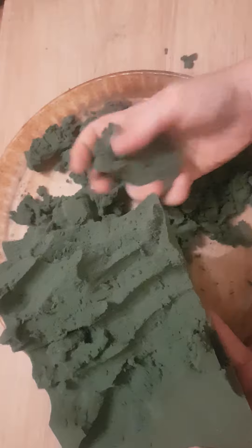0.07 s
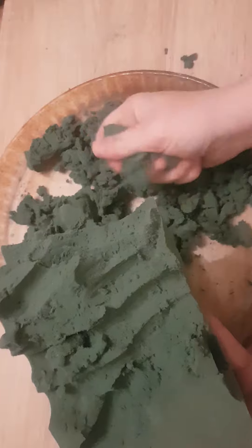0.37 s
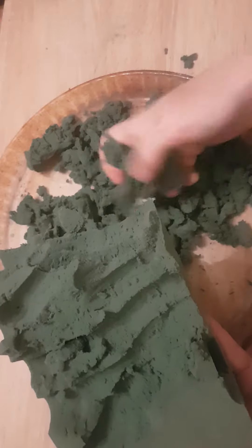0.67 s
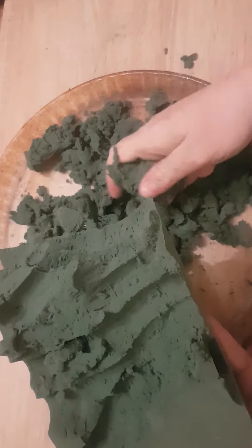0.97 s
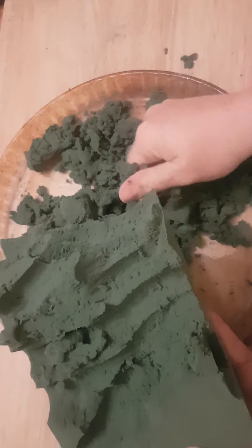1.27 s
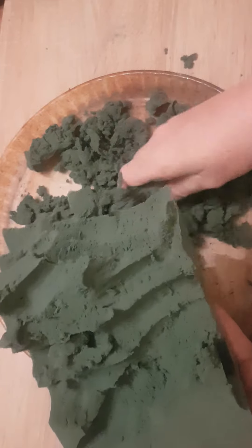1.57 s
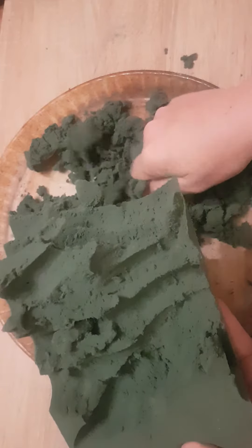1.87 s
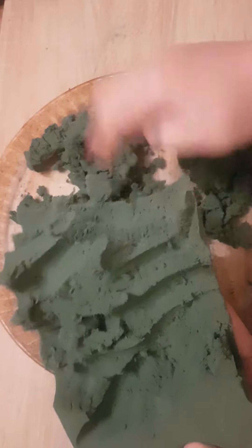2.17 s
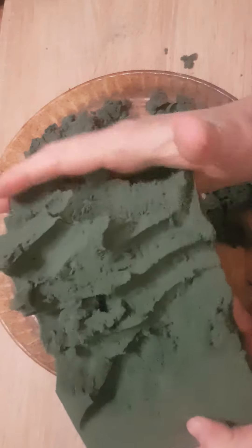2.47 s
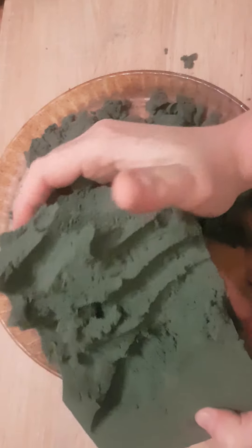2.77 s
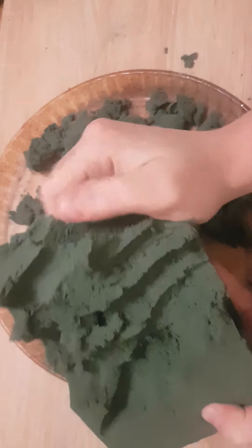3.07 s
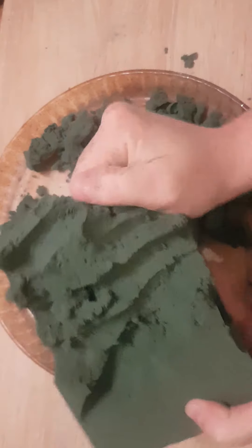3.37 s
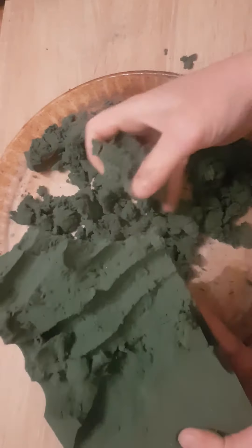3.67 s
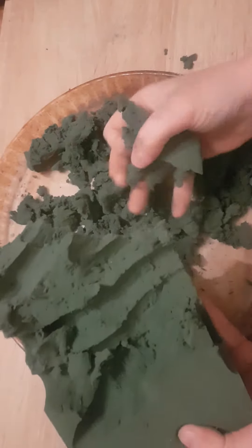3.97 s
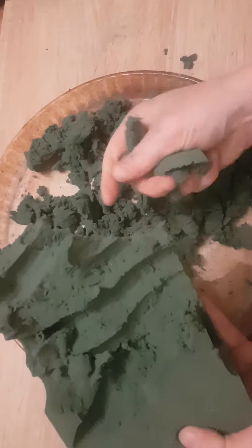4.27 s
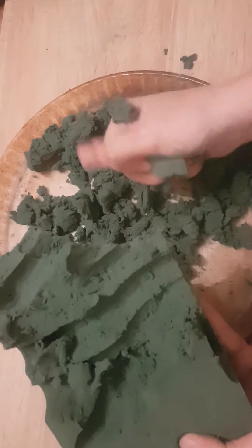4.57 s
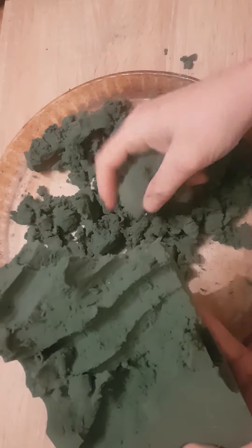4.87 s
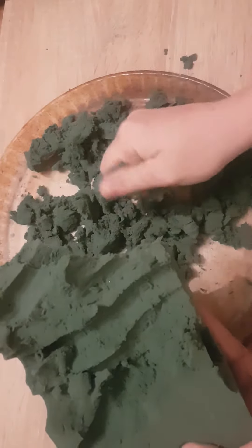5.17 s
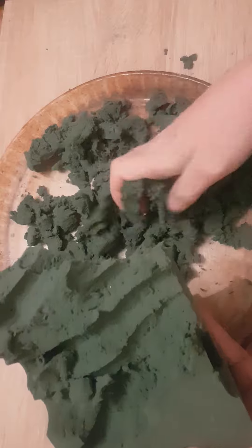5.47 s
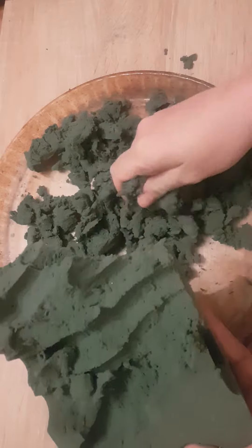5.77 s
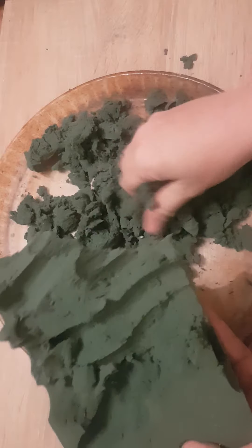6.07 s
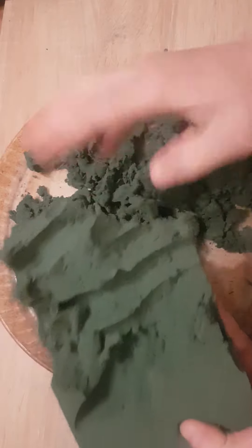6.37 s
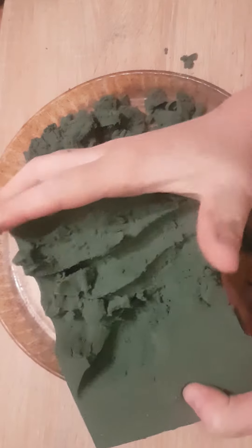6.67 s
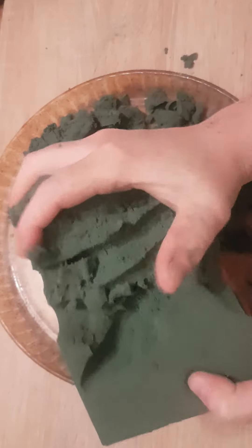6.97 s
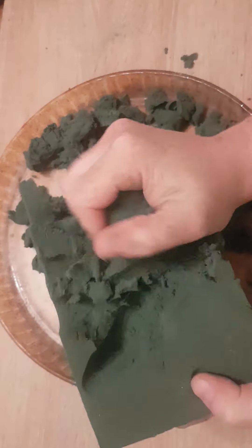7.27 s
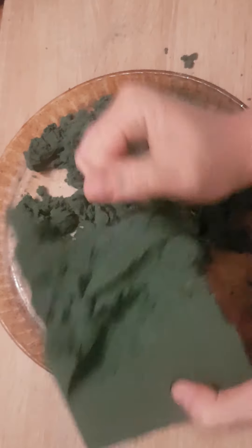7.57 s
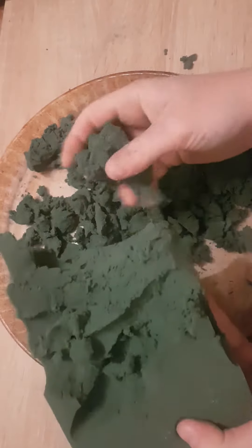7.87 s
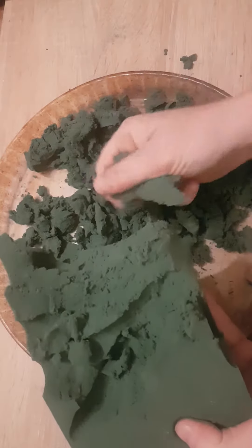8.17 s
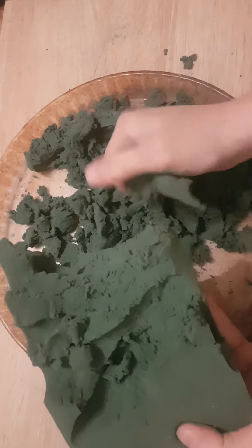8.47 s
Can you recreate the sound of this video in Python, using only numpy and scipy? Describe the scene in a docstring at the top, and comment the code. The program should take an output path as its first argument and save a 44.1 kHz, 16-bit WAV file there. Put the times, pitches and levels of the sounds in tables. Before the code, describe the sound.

Dry foam crunches and snaps twice under digging fingers, and the loose pieces are ground to powder with a faint hiss.

```python
"""Crumbling dry floral foam

A hand crumbles the foam over a plastic plate on a table, close by in a quiet room. Twice the fingers
dig through the big block's brittle cells and break a piece off; each crack rings the plate.
In between they squeeze the loose pieces to powder: a soft hiss with scuffs and small ticks."""
import sys
import numpy as np
from scipy import signal
from scipy.io import wavfile

SR = 44100
rng = np.random.default_rng(int(sys.argv[2]) if len(sys.argv) > 2 else 0)


def bounce(signal):
    """Save signal as a 16-bit WAV file at the path given by the first command-line argument."""
    frames = np.transpose(np.atleast_2d(signal))
    limited = np.clip(frames, -1, 1)
    pcm = np.round(limited * 32767).astype(np.int16)
    wavfile.write(sys.argv[1], SR, pcm)


N = 380141

# The tone of crumbs being crushed. Each row: frequency in Hz, level in dB.
CRUMB_TONE = [(100, -28), (330, 2.5), (460, -13), (650, 3.5), (1150, 0), (1800, -4), (2500, 0), (3500, 0),
              (7500, -3), (10000, -7), (16000, -16)]


def cracks(knock_hz=250, low_ratio=0.6, first_snap_db=7, give_share=0.3):
    """The block snaps and splinters; as the piece gives, it swings, knocks and rings the plate."""
    # Each row: start in seconds, level in dB, pitch in Hz, splintering time in seconds,
    # then the dB added for the splinters, the low swing, the knock and the plate.
    breaks = [(2.7371, -17.5, 1200, 0.0016, 1.5, 0, -7, -7.5),
              (3.185, -19.5, 1210, 0.0041, -2, 2.5, -1.5, -8),
              (3.353, -28.5, 1160, 0.0031, -6, -8.5, -1.5, 2.5),
              (3.4096, -32.5, 1730, 0.003, -3, -3, -3, -8),
              (7.113, -21.5, 1146, .005, -3.5, -9, -21.5, -3.5),
              (7.1647, -13, 1190, 0.0028, -8.5, 4, -1.5, -7), (7.2304, -17, 910, 0.007, -7, 2.5, 3.5, -8.5)]
    # The plastic plate's notes. Each row: pitch in Hz, level in dB, seconds to fade by 60 dB.
    plate_notes = [(765, -1.5, .02), (1206, -2.5, .034), (2370, -7, 0.018), (3000, -5.5, 0.02),
                   (4100, -15.5, 0.0086)]
    # The tone of splintering. Each row: frequency in Hz, level in dB.
    splinter_tone = [(100, -17), (300, -7.5), (1000, 5), (4400, -2), (6000, -15), (9000, -21),
                     (16000, -34.5)]
    out, t = np.zeros(N), np.arange(SR // 10) / SR
    knock = ring(knock_hz, cycles=0.26, rise=0.4)
    plate = sum(amp(db) * ring(hz, cycles=hz * fade / np.log(1000), rise=0.3)
                for hz, db, fade in plate_notes)
    for s, db, hz, run_on, splinters_db, low_db, knock_db, plate_db in breaks:
        snaps = amp(first_snap_db) * (t == 0) + rng.choice([-1., 1.], len(t)) * np.exp(-t / run_on)
        splinters = amp(3.5 + splinters_db) * colour(snaps, splinter_tone)
        add(out, s, amp(db) * (ring(hz, cycles=1.3, rise=0.24) + splinters))
        swing = amp(low_db) * ring(hz * low_ratio, cycles=0.72, rise=0.28)
        giving_way = swing + amp(knock_db) * knock + amp(plate_db) * plate
        add(out, s + give_share * run_on, amp(db) * giving_way)
    return out


def collapsing_foam():
    """Tiny cells collapse with a crunch, a boom from the block and a hiss of fine powder."""
    # The tones of the three sounds. Each row: frequency in Hz, level in dB.
    crunch_tone = [(100, -36), (300, -11.5), (550, -0.5), (1250, -1.5), (2200, -9), (3000, -11.5),
                   (4200, -17), (6000, -24.5), (15000, -53)]
    boom_tone = [(30, -30), (90, -12.5), (170, 3), (280, 4), (420, -0.5), (620, -5.5), (1500, -36.5)]
    powder_tone = [(500, -25.5), (2000, 1), (3500, 0.5), (6000, -3.5), (8200, -3), (10000, -9),
                   (13000, -13), (16000, -24.5)]
    bunches = clumps(per_s=180, depth_db=1.98)
    crunch = unit(colour(bunches * cells(per_s=5000, spread_db=1.8), crunch_tone))
    boom = unit(colour(bunches * cells(per_s=4500, spread_db=2), boom_tone))
    powder = unit(colour(cells(per_s=20000, spread_db=3.5), powder_tone))
    return crunch, boom, powder


def digging():
    """How strong the crunch, boom and powder are as the fingers plough through the block."""
    # One list per finger stroke. Each row: time in seconds, then crunch, boom and powder in dB.
    strokes = [
        [(2.395, -62, -69, -69.5), (2.404, -56.5, -64, -60), (2.495, -53, -53, -57.5),
         (2.52, -40.5, -49, -57.5), (2.7, -41.5, -44.5, -58.5), (2.8, -40.5, -45, -52),
         (2.86, -35.5, -41, -51.5), (2.94, -39.5, -44.5, -50), (3.045, -38.5, -45, -48),
         (3.13, -35, -44.5, -41.5), (3.24, -46, -44, -50.5), (3.32, -61, -53.5, -60), (3.35, -48, -54, -58)],
        [(6.575, -68.5, -76, -69), (6.625, -56.5, -63.5, -68.5), (6.68, -60, -62.5, -69),
         (6.84, -39.5, -44.5, -60), (6.95, -47.5, -53.5, -58.5), (7.02, -42.5, -45.5, -51.5),
         (7.037, -34, -47, -51), (7.11, -30, -48, -49), (7.2, -33.5, -44, -45), (7.36, -49, -45.5, -48.5),
         (7.41, -55.5, -62, -62.5), (7.5, -65, -69, -64)],
    ]
    out, t = np.zeros((3, N)), np.arange(N) / SR
    for stroke in strokes:
        s, *levels = np.transpose(stroke)
        out += amp([np.interp(t, s, db, left=-np.inf, right=-np.inf) for db in levels])
    return out


def hollows(width_hz=100):
    """Collapsing cells ring the hollow under the hand; its pitch slides as it changes shape."""
    # One list per sliding note. Each row: time in seconds, pitch in Hz, level in dB.
    slides = [
        [(2.7, 1300, -53.5), (2.86, 1156, -41.5), (3.03, 1010, -50)],
        [(2.96, 537, -41.5), (3.13, 566, -42), (3.24, 485, -50.5)],
        [(7.0, 1020, -51.5), (7.05, 903, -41), (7.18, 746, -37), (7.27, 739, -45), (7.38, 690, -50)],
    ]
    out = np.zeros(N)
    for slide in slides:
        s, hz, db = np.transpose(slide)
        t = np.arange(s[0], s[-1], 1 / SR)
        tone = unit(resonate(rng.standard_normal(len(t)), np.interp(t, s, hz), width_hz))
        add(out, s[0], amp(np.interp(t, s, db)) * tone)
    return out


def tearing(crunch, boom, powder, attack_s=0.0018, release_s=0.0023):
    """The last cells holding a piece rip in a bright rasp that stops dead when it comes free."""
    # Each row: start and length in seconds, level in dB, swell in dB per second,
    # then the dB added for the boom and the powder.
    tears = [(3.351, 0.04, -47, -64, -3, 4), (3.391, 0.074, -52, 80, -14, -4.5),
             (7.495, 0.067, -62.5, 150, -15, 2)]
    out = np.zeros(N)
    for s, length, db, swell, boom_db, powder_db in tears:
        t = np.arange(0, 2 * length, 1 / SR)
        edges = np.minimum(t / attack_s, 1) * np.exp(-np.maximum(t - length, 0) / release_s)
        rasp = crunch + amp(boom_db) * boom + amp(powder_db) * powder
        add(out, s, amp(db + swell * np.minimum(t, length)) * edges * rasp[round(s * SR):][:len(t)])
    return out


def chips(gain, per_s, boost_db, range_db, hz, octaves):
    """Chips crack off at random and ring briefly, as strong as the hand presses at that moment."""
    out = np.zeros(N)
    for when, size, pitch in rng.random((int(per_s * N / SR), 3)):
        at = int(when * N)
        if gain[at] > 0:
            chip = ring(hz * 2 ** (octaves * (2 * pitch - 1)), cycles=1.7, rise=0.12)
            add(out, at / SR, gain[at] * amp(boost_db + range_db * size ** 2) * chip)
    return out


def grip():
    """How strong the squeezing and its treble are: each squeeze swells, then eases off."""
    # Each row: firmest moment in seconds, level in dB, closing and easing times in seconds,
    # dB added to the treble. Firm squeezes are bright; gathering the pieces is dull.
    squeezes = [(.04, -69, 0.31, 0.39, -13), (.2, -58, 0.026, 0.072, -2.5), (.42, -72, 0.28, 0.17, 5),
                (0.629, -64.5, 0.016, 0.014, -11), (.68, -67, 0.027, 0.043, -10),
                (.97, -67.5, 0.17, 0.063, -1.5), (1.13, -68.5, 0.13, 0.15, 3),
                (1.31, -70.5, 0.058, 0.26, -5.5), (1.65, -68.5, 0.088, 0.18, 2.5),
                (3.48, -68.5, 0.022, 0.38, -19), (3.839, -60.5, 0.12, 0.17, -2.5),
                (4.18, -62.5, 0.063, 0.18, 0), (4.47, -75.5, 0.17, 0.08, 7),
                (4.64, -67.5, 0.032, 0.045, -6.5), (4.76, -70, 0.06, 0.017, -7),
                (4.882, -62, 0.052, 0.06, -8), (5.12, -69, 0.25, 0.21, 3), (5.71, -65, 0.12, 0.13, -2),
                (5.94, -67.5, 0.071, 0.17, -4), (7.64, -66, 0.11, 0.069, -4),
                (7.88, -68.5, 0.24, 0.038, -8), (8.21, -62, 0.2, 0.067, 1.5), (8.36, -74.5, 0.1, 0.51, 4),
                (8.514, -62.5, 0.0055, 0.041, -8)]
    t, power = np.arange(0, N / SR, .002), 0
    for s, db, closing, easing, treble_db in squeezes:
        away = np.maximum((s - t) / closing, (t - s) / easing)
        swell = np.exp(-away ** 1.3)  # a power of 1 is pointed, 2 is rounded
        power = power + np.outer(amp([db, db + treble_db]), swell) ** 2
    return [np.interp(np.arange(N) / SR, t, np.sqrt(p)) for p in power]


def squeezing(gain, treble_gain, treble_from_hz=4700):
    """Loose lumps are ground to powder: many tiny snaps blur into a hiss."""
    grit = cells(per_s=12000, spread_db=3.0) * clumps(per_s=120, depth_db=1.62)
    hiss = unit(colour(grit, CRUMB_TONE))
    dull = signal.filtfilt(*signal.butter(2, treble_from_hz, fs=SR), hiss)
    return amp(2.5) * (gain * dull + treble_gain * (hiss - dull))


def ticks(grit_s=0.0019):
    """Thin walls snap or crumbs drop on the plate: dry ticks, each with a pinch of grit."""
    # Each row: start in seconds, level in dB, pitch in Hz, dB added for the grit.
    crumbs = [(0.1994, -32.5, 2200, -24), (0.323, -49, 278, 0.5), (1.476, -55.5, 241, -7),
              (2.6662, -25.5, 2380, -18), (2.9168, -21, 3470, -19), (3.049, -20, 3720, -20),
              (3.352, -20.5, 6060, -13), (4.3023, -50.5, 352, -20), (4.3985, -45.5, 2650, -15),
              (6.054, -46.5, 1410, -15), (7.219, -21, 800, -22), (7.368, -31.5, 2680, -12),
              (8.0628, -37.5, 3000, -15), (8.098, -35, 1720, -18)]
    out, t = np.zeros(N), np.arange(SR // 10) / SR
    for s, db, hz, grit_db in crumbs:
        grit = unit(colour(rng.standard_normal(len(t)), CRUMB_TONE)) * np.exp(-t / grit_s)
        add(out, s, amp(db) * (ring(hz, cycles=0.43, rise=0.72) + amp(grit_db) * grit))
    return out


def bumps():
    """The hand bumps the block against the plate with a dull thud, or a breaking piece gives a low thump."""
    # Each row: start in seconds, level in dB, pitch in Hz.
    thuds = [(2.352, -48.5, 54), (2.413, -50, 139), (3.413, -40.5, 104), (6.534, -40, 70),
             (7.232, -31.5, 107), (7.552, -53.5, 70.4)]
    out = np.zeros(N)
    for s, db, hz in thuds:
        add(out, s, amp(db) * ring(hz, cycles=0.49, rise=0.26))
    return out


def scuffs(extra_rows):
    """A finger or a lump slips over foam, or a small wall cracks: a short rush of grains rings the lump at its
    own pitch."""
    # Each row: start in seconds, level in dB, length in seconds, pitch in Hz, sharpness of the ring (Q).
    rubs = [(0.19, -54.5, 0.047, 774, 2), (0.958, -58.5, 0.048, 970, 0.7), (1.268, -62, 0.076, 1270, 2.8),
            (1.285, -55.5, 0.011, 1295, 1.3), (1.322, -54, 0.01, 1150, 1.3), (1.524, -58, 0.051, 1120, 1),
            (1.612, -55, 0.095, 1250, 2.1), (1.867, -53, 0.015, 1420, 16), (1.879, -64.5, 0.059, 1580, 5.1),
            (1.951, -61, 0.023, 1130, 0.6), (1.975, -62.5, 0.048, 1580, 0.74),
            (2.339, -47, 0.038, 1080, 0.66), (3.056, -35, 0.008, 3800, 1.3), (3.365, -47, 0.065, 1210, 5.8),
            (4.019, -60, 0.047, 1240, 2), (4.15, -56, 0.071, 1060, 0.48), (4.398, -66, 0.035, 3000, 1.8),
            (4.875, -61.5, 0.053, 890, 3.5), (5.15, -66.5, 0.035, 700, 0.7), (5.3, -71, 0.12, 1290, 1.5),
            (5.366, -47.5, 0.0045, 1000, 3.8), (5.655, -62.5, 0.12, 1130, 1),
            (6.048, -59.5, 0.044, 1360, 2.2), (6.532, -48.5, 0.022, 1510, 1.9),
            (6.613, -50, 0.019, 1720, 1.8), (7.47, -56.5, 0.12, 980, 4.1), (7.895, -58.5, 0.055, 2770, 2.3),
            (8.125, -61.5, 0.047, 760, 2.2)]
    # The tone of rubbed foam. Each row: frequency in Hz, level in dB.
    rub_tone = [(100, -39), (450, -5), (700, 4), (2100, -2.5), (2700, -2.5), (8000, -3.5), (16000, -10.5)]
    out, grit = np.zeros(N), colour(cells(per_s=9000, spread_db=4.0), rub_tone)
    for s, db, length, hz, q in rubs + extra_rows:
        rush = grit[round(s * SR):][:round(2 * length * SR)]
        progress = np.arange(len(rush)) / (length * SR)
        swell = np.minimum(progress / 0.25, 1) * np.exp(-1.6 * progress ** 3)
        lump = signal.lfilter(*signal.iirpeak(hz, q, fs=SR), rush)
        add(out, s, amp(db) * unit(lump + 0.033 * rush) * swell)
    return out


def slips(gain, per_s=6.2, boost_db=2.5, typical_s=0.024, middle_hz=1120, octaves=0.35, q=0.99):
    """Rows for faint, random scuffs, as strong as the grip at that moment."""
    rows = []
    for k, (when, size, pitch) in enumerate(rng.random((int(per_s * N / SR) - 1, 3))):
        s = (k + when) / per_s
        db = boost_db + 20 * np.log10(gain[int(s * SR)] * (.5 + size) + 1e-9)
        hz = middle_hz * 2 ** (octaves * (2 * pitch - 1))
        rows.append((s, db, typical_s * (.5 + size), hz, q))
    return rows


def room(x, size=256, rise_s=0.0027):
    """The room answers each sound with a soft wash of echoes."""
    # Each row: frequency in Hz, seconds for the echo to fade by 60 dB.
    fade_times = [(100, 0.49), (1500, 0.32), (15000, 0.88)]
    hz, t, noise = signal.stft(rng.standard_normal(SR // 2), SR, nperseg=size)
    decay = amp(-60 * t / read(fade_times, hz)[:, None])
    tail = signal.istft(noise * decay * np.minimum(t / rise_s, 1), SR, nperseg=size)[1]
    return signal.fftconvolve(x, tail / np.linalg.norm(tail))[:N]


def hush(level_db=-70.5):
    """The steady background noise of the room and the microphone."""
    # Each row: frequency in Hz, level in dB.
    hush_tone = [(20, -17), (50, -5.5), (110, -3), (250, -6), (400, -10), (1000, -17), (5000, -29),
                 (15500, -35)]
    return amp(level_db) * unit(colour(rng.standard_normal(N), hush_tone, body=0, size=8192))


def cells(per_s, spread_db):
    """Cell walls snapping: random clicks, most small, a few large."""
    chance, strength, sign = rng.random((3, N))
    size = amp(spread_db * np.minimum(-np.log(1 - strength), 4))
    return unit(size * np.sign(sign - .5) * (chance < per_s / SR))


def clumps(per_s, depth_db):
    """Cells give way in bunches, so the level flutters at random."""
    wobble = rng.standard_normal(N)
    return amp(depth_db * np.interp(np.arange(N) * per_s / SR, np.arange(N), wobble))


def ring(hz, cycles, rise):
    """A struck surface swings and soon stops; its fade and rise are counted in cycles."""
    turns = hz * np.arange(SR // 10) / SR
    position = np.sin(2 * np.pi * turns) * np.exp(-turns / cycles) * (1 - np.exp(-turns / rise)) ** 2
    speed = np.gradient(position)  # the sound follows the surface's speed
    return speed / abs(speed).max()


def resonate(x, hz, width):
    """Makes a sound ring at a sliding pitch."""
    turn = np.exp(2j * np.pi * np.cumsum(hz) / SR)
    r = np.exp(-np.pi * width / SR)
    return (turn * signal.lfilter([(1 - r) ** 2], [1, -2 * r, r * r], x / turn)).real


def colour(x, tone, body=1, size=2048):
    """Gives a sound a tone, plus the ring of block, plate and table unless body is 0."""
    # Each row: pitch in Hz, width in Hz, boost or cut in dB.
    resonances = [(354, 60, 4), (465, 150, -2), (573, 44, 2), (1250, 88, 1), (1670, 70, -1.5),
                  (2020, 420, 4), (2680, 180, -0.5)]
    hz = abs(np.fft.fftfreq(size, 1 / SR))
    lift = sum(db / (1 + (2 * (hz - f) / width) ** 2) for f, width, db in resonances)
    log_gain = np.log(amp(read(tone, hz) + body * lift))
    # This filter rings only after a click, never before it.
    response = np.fft.ifft(np.exp(np.conj(signal.hilbert(log_gain)))).real
    return signal.oaconvolve(x, response)[:len(x)]


def amp(db):
    """Turns decibels into a gain."""
    return 10 ** (np.asarray(db) / 20)


def unit(x):
    """Scales a sound to an average (rms) level of 1."""
    return x / np.sqrt(np.mean(x ** 2) + 1e-20)


def read(points, hz):
    """Looks up values between a table's rows, spacing the octaves evenly."""
    f, value = np.transpose(points)
    return np.interp(np.log(hz + 1), np.log(f + 1), value)


def add(mix, s, sound):
    """Mixes a sound in at s seconds."""
    part = mix[max(round(s * SR), 0):][:len(sound)]
    part += sound[:len(part)]


def scene():
    """All the foam sounds, close by, in the quiet room."""
    voices, dig_gains, background = collapsing_foam(), digging(), hush()
    grip_gain, treble_gain = grip()
    block = (dig_gains * voices).sum(axis=0) + hollows() + tearing(*voices) + cracks()
    loose = squeezing(grip_gain, treble_gain) + ticks() + bumps() + scuffs(slips(grip_gain))
    block += chips(dig_gains[0], per_s=67, boost_db=-2, range_db=9, hz=1499, octaves=1.36)
    loose += chips(grip_gain, per_s=35, boost_db=3.5, range_db=8.6, hz=2370, octaves=1.6)
    foam = block + loose
    return (foam + amp(-15.0) * room(foam) + background)[None]


def record(dry, edge_hz=15750):
    """Cuts off the very highest treble."""
    low_pass = signal.firwin(511, edge_hz, window=("kaiser", 9), fs=SR)
    return signal.oaconvolve(dry, low_pass[None], "same")


dry = scene()
out = record(dry)
bounce(out)
```